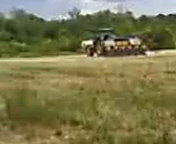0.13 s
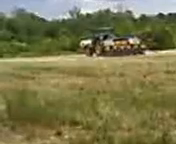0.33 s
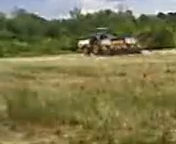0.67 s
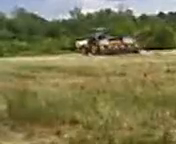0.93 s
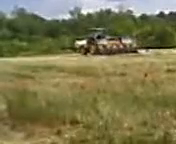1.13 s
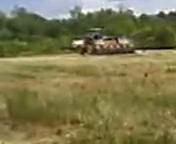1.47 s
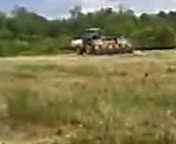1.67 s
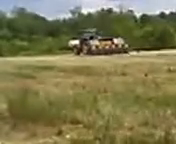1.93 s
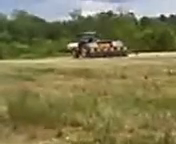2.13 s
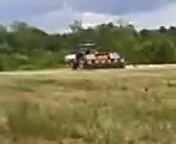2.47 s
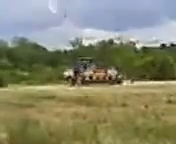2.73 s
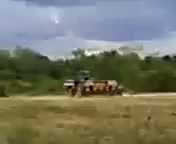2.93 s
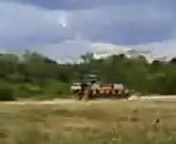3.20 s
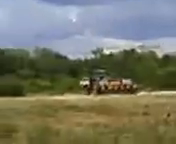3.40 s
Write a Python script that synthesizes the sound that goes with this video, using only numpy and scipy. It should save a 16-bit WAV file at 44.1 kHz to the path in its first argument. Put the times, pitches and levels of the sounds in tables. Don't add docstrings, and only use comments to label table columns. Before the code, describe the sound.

Silence until 0.13 s, then a tiny switch-on crackle and a diesel tractor is at once running. It drones steadily to the end, about 25 firings a second in a lumpy three-beat pattern: hollow exhaust puffs, metallic valve clatter, pulsing hiss, thin gear whine. Clatter sharpens after about 2.6 s. Wind thumps softly near 2.67 s, fainter puffs follow, and a slight tick at 3.34 s. Open field, muffled narrow-band microphone.

```python
import sys
import numpy as np
from scipy import signal
from scipy.fft import rfft, irfft
from scipy.io import wavfile

SR = 44100
rng = np.random.default_rng(int(sys.argv[2]) if len(sys.argv) > 2 else 0)


def to_wav(s):
    ch = np.atleast_2d(s).T
    pcm = np.round(np.clip(ch, -1, 1) * 32767)
    wavfile.write(sys.argv[1], SR, pcm.astype(np.int16))


def how_loud(loudness_db):
    steps = np.asarray(loudness_db, float) / 20
    return 10 ** steps


N = 157878
T = np.arange(N) / SR
SWITCH_ON_S = .13275
JITTER_S = .00006
CYCLE_SAMPLES = 5300


def in_time(rows):
    return np.interp(T, *np.transpose(rows)[:2])


def rms_one(x):
    return x / np.sqrt(np.mean(x ** 2) + 1e-20)


def cut(x, hz, kind, order=2):
    return signal.sosfilt(signal.butter(order, hz, kind, fs=SR, output="sos"), x)


def drift(rate_hz):
    pole = np.exp(-80 * np.pi * rate_hz / SR)
    slow = signal.lfilter([1], [1, -2 * pole, pole * pole], rng.standard_normal(N // 40 + 2002))[2000:]
    return np.interp(np.arange(N) / 40, np.arange(len(slow)), rms_one(slow))


def ring(strikes, hz, t60_s):
    pole, angle = how_loud(-60 / (t60_s * SR)), 2 * np.pi * hz / SR
    return signal.lfilter([0, np.sin(angle)], [1, -2 * pole * np.cos(angle), pole * pole], strikes + 1e-18)


def clicks(times_s, sizes):
    out = np.zeros(N)
    at = (times_s * SR).astype(int)
    inside = (at >= 0) & (at < N)
    np.add.at(out, at[inside], sizes[inside])
    return out


def bell(width_s):
    half = int(4 * width_s * SR)
    return np.exp(-.5 * (np.arange(-half, half + 1) / (width_s * SR)) ** 2)


def swell(centre_s, width_s):
    return np.exp(-.5 * ((T - centre_s) / width_s) ** 2)


def each_cycle(noise, turns):
    return noise[..., (turns / 3 % 1 * CYCLE_SAMPLES).astype(int)]


def switch_on():
    # after_s (from switch-on), signed height
    crackle = [
        (.00008, .8),
        (.00024, .4),
        (.00031, .8),
        (.00058, .8),
        (.00068, -.6),
        (.00088, 1),
    ]
    after_s, height = np.transpose(crackle)
    spikes = signal.fftconvolve(clicks(SWITCH_ON_S + after_s, height), bell(.000026), "same")
    fizz_db, fizz_s, fizz_t60_s = -31, .025, .11
    since = T - SWITCH_ON_S
    decay = how_loud(fizz_db - 60 * np.clip(since, 0, 1) / fizz_t60_s)
    gate = (since > 0) * np.clip((fizz_s - since) * 500, 0, 1)
    fizz = rms_one(cut(rng.standard_normal(N), [3600, 8200], "band", order=4))
    return spikes + decay * gate * fizz


def crank():
    # time_s, firing_rate_hz
    speed = [(0, 24.9), (.3, 24.9), (.7, 24.976), (1.1, 24.975), (1.5, 24.944), (1.9, 24.925),
             (2.3, 24.933), (2.7, 24.954), (3.1, 24.951), (3.6, 24.9)]
    turns = np.cumsum(in_time(speed)) / SR
    return turns - np.interp(.3795, T, turns)


def firings(turns):
    count = np.arange(np.ceil(turns[0]), turns[-1]).astype(int)
    times_s = np.interp(count, turns, T) + JITTER_S * rng.standard_normal(len(count))
    return times_s, count % 3


def exhaust(fired_s, cylinder, turns):
    # multiple of the firing rate, level_db (rms)
    tones = [(1, -15), (2, -13), (3, -17.5), (4, -7.5), (5, -9.5), (6, -7), (7, -19), (8, -12.5),
             (9, -25.5), (11, -13), (14, -14)]
    # pitch_hz, t60_s, level_db for each of three cylinders
    pipe = [(162, 0.13, -18.5, -14, -27), (266, 0.3, -9, -15.5, -10), (295, 0.17, 1.5, -20, -28.5),
            (364.3, 0.12, -15.5, -21, 3.5), (424.3, 0.22, -2, -13, -5.5), (520, 0.05, -9, -16, -14),
            (581, 0.14, -13.5, -15, -10), (642, 0.13, -14.5, -10.5, -13), (716, 0.15, -17, -5.5, -8.5)]
    tone_wander_db, puff_scatter_db = 2.2, 2.5
    pipe_lag_s, pipe_damping = -.014, .65
    out = np.zeros(N)
    for k, db in tones:
        sweep = .09 * (k - 4.6) * (2 < k < 8)
        lead = sweep + k * 25 * .0004
        level = how_loud(db + tone_wander_db * drift(5))
        out += np.sqrt(2) * level * np.cos(2 * np.pi * (k * turns + lead))
    for hz, t60_s, *db in pipe:
        puffs = how_loud(np.array(db)[cylinder] + puff_scatter_db * rng.standard_normal(len(fired_s)))
        out += ring(clicks(fired_s + pipe_lag_s, puffs), hz, t60_s * pipe_damping)
    return out


def chuff(fired_s, cylinder, turns):
    cylinder_db, scatter_db = np.array((-13, -18, -6)), 1.2
    lag_s, length_s = .02, .0097
    sizes = how_loud(cylinder_db[cylinder] + scatter_db * rng.standard_normal(len(fired_s)))
    gate = signal.fftconvolve(clicks(fired_s + lag_s, sizes), bell(length_s), "same")
    white = rng.standard_normal(N)
    breath = .85 * each_cycle(white, turns) + .5 * white[::-1]
    return gate * rms_one(cut(breath, [488, 733], "band"))


def clatter(fired_s, cylinder):
    # pitch_hz, t60_s, level_db for each of three cylinders
    block = [(1696.5, 0.056, -3.5, -5.5, -3), (2226, 0.035, -6, 5, 1.5), (2444, 0.04, -11, 4.5, -3.5),
             (2880, 0.013, -12, -9.5, -2), (3090, 0.034, -5, -6, -9.5)]
    # lag_s, level_db
    knocks = [
        (.0155, -13),
        (.0195, -1),
        (.0225, -3),
        (.026, -6),
        (.031, -10),
    ]
    # time_s, hard_knock_extra_db, next_cylinder_extra_db
    slams = [(.2, 0.5, 3), (.32, -3.5, -3), (.44, -4, -10), (.56, -9.5, 1), (.68, -5.5, 3.5), (.8, -1, -7),
             (.92, -1, -4), (1.04, -2.5, -7), (1.16, 0.5, -4), (1.28, -3.5, -2), (1.4, 2.5, -9),
             (1.52, -1, -0.5), (1.64, -1, 3), (1.76, 2, 0), (1.88, 0, -7), (2, 0, -5), (2.12, 2.5, 2),
             (2.24, 0.5, 2.5), (2.36, 0, 1), (2.48, 2.5, -1), (2.6, 2.5, 6.5), (2.72, 4, 2), (2.84, 4.5, 2),
             (2.96, 3.5, 2), (3.08, 4.5, 5.5), (3.2, 4, -5.5), (3.32, 2.5, 2), (3.44, 2.5, -2),
             (3.56, 1, 0)]
    spread_s, scatter_db = .0005, 1.3
    lag_s, knock_db = np.transpose(knocks)
    cycle_s, hard_db, next_db = np.transpose(slams)

    late_s = (lag_s + spread_s * rng.standard_normal((3, len(lag_s))))[cylinder]
    late_s = late_s + 1.5 * JITTER_S * rng.standard_normal(late_s.shape)
    times_s = (fired_s[:, None] + late_s).ravel()

    middle_s = fired_s[:, None] + .02 - .04 * (cylinder[:, None] - 1)
    cycle = np.abs(middle_s - cycle_s).argmin(axis=1)
    extra_db = np.choose(cylinder, [0 * fired_s - 2, hard_db[cycle], next_db[cycle]])[:, None]

    out = np.zeros(N)
    for hz, t60_s, *db in block:
        level_db = np.array(db)[cylinder, None] + knock_db
        level_db = level_db + extra_db * (hz > 2000)
        sizes = how_loud(level_db + scatter_db * rng.standard_normal(late_s.shape))
        out += ring(clicks(times_s, sizes.ravel()), hz, t60_s)
    return cut(out, 3100, "low", order=4)


def gear_whine():
    # time_s, level_db
    load = [(.2, -14.5), (.9, -13), (1, -11.5), (1.6, -10), (1.9, -14.5), (2.9, -12.5), (3.4, -12.5),
            (3.58, -6)]
    pitch_hz, width_hz = 1698, 13
    return how_loud(in_time(load)) * rms_one(ring(rng.standard_normal(N), pitch_hz, 2.2 / width_hz))


def hiss(fired_s, turns):
    # pitch_hz, level_db
    colour = [(130, -9), (204, -7), (425, -8), (750, -13.5), (1000, -19), (2470, -12), (3500, -35),
              (5000, -51)]
    # pitch_hz, share (0-1)
    repeats = [(200, .7), (500, .8), (800, .7), (1200, .5), (2400, .5), (3000, .15)]
    hiss_db, patchy_db, bright_patchy_db = -2, 1.8, 1.5
    dip_db, bright_dip_db, dip_lag_s, dip_s = -1, -5, .0081, .0033
    dips = signal.fftconvolve(clicks(fired_s + dip_lag_s, np.ones(len(fired_s))), bell(dip_s), "same")
    fresh = rng.standard_normal((2, N))
    looped = each_cycle(rng.standard_normal((2, CYCLE_SAMPLES)), turns)
    bright_wander = drift(20)
    hz, db = np.transpose(colour)
    edges = 130 * 2 ** np.arange(0, 5.6, .5)
    rush = 0
    for k, (low, high) in enumerate(zip(edges, edges[1:])):
        level_db = np.interp(np.log(low * high) / 2, np.log(hz), db) + patchy_db * drift(12.7)
        level_db = level_db + (low > 1400) * bright_dip_db * dips
        level_db = level_db + (low > 2800) * bright_patchy_db * bright_wander
        share = np.interp(np.sqrt(low * high), *np.transpose(repeats))
        white = np.sqrt(share) * looped[k % 2] + np.sqrt(1 - share) * fresh[k % 2]
        rush = rush + how_loud(level_db) * cut(white, [low, high], "band")
    return how_loud(dip_db * dips) * (how_loud(hiss_db) * rms_one(rush) + gear_whine())


def wind():
    # centre_s, level_db, length_s, cutoff_hz
    gusts = [
        (2, -34, 0.017, 132),
        (2.58, -34, 0.057, 200),
        (2.657, -28.5, 0.0086, 400),
        (2.673, -19, 0.0087, 240),
        (2.695, -23.5, 0.006, 150),
        (3.15, -34, 0.027, 160),
        (3.296, -34.5, 0.032, 68.5),
        (3.403, -29, 0.014, 100),
        (2.68, -27, .022, 330),
    ]
    out = how_loud(-44 + drift(4.9)) * rms_one(cut(rng.standard_normal(N), [25, 110], "band"))
    for centre_s, db, length_s, hz in gusts:
        rumble = rms_one(cut(rng.standard_normal(N), [hz / 3, hz], "band"))
        out += how_loud(db) * swell(centre_s, length_s) * rumble
    return out


def body_tick():
    tick_s = 3.336
    dip = -how_loud(-15) * signal.fftconvolve(clicks(np.array([tick_s]), np.ones(1)), bell(.00007), "same")
    fizz = rms_one(cut(rng.standard_normal(N), [2500, 4700], "band"))
    return dip + how_loud(-36) * swell(tick_s, .004) * fizz


def scene():
    # time_s, level_db
    loudness = [(.13, -31.5), (.6, -31), (1.5, -30.5), (2.4, -31), (3, -31), (3.58, -30.5)]
    turns = crank()
    fired_s, cylinder = firings(turns)
    tractor = exhaust(fired_s, cylinder, turns) + chuff(fired_s, cylinder, turns)
    tractor = tractor + clatter(fired_s, cylinder) + hiss(fired_s, turns)
    return (how_loud(in_time(loudness)) * tractor + wind() + body_tick())[None]


def dropouts(x):
    # low_edge_hz, rarity (spreads of the wander)
    bands = [(3400, 1.7), (3700, 1.2), (4000, 1), (4300, 1), (4600, .9), (4850, .6), (5050, .1)]
    hz = np.arange(N // 2 + 1) * SR / N
    spectrum = rfft(x)
    upper_edges = [low for low, _ in bands[1:]] + [SR]
    for (low, rarity), high in zip(bands, upper_edges):
        muted = np.clip(3 * (drift(22) - rarity), 0, .93)
        x = x - muted * irfft(spectrum * ((hz >= low) & (hz < high)), N)
    return x


def low_pass(x):
    return signal.sosfilt(signal.butter(12, 13700, fs=SR, output="sos"), x)


def record(dry):
    on = T > SWITCH_ON_S
    settle_s, settle_db = .022, -9
    unsettled = np.clip(1 - (T - SWITCH_ON_S) / settle_s, 0, 1) ** .5
    x = cut(dry, 2950, "low", order=3) * how_loud(settle_db * unsettled)
    x = (x - .0045) * on
    x = signal.sosfilt(signal.cheby2(18, 60, 5400, fs=SR, output="sos"), x)
    x = dropouts(x) * on
    mirror = x * np.cos(2 * np.pi * 11025 * T)
    x = x + how_loud(-66) * cut(mirror, [7800, 9600], "band", order=4)
    x = x + cut(switch_on(), 9000, "low", order=8)
    x = x + how_loud(-92) * on * cut(rng.standard_normal(N), 11000, "low")
    return low_pass(x)


dry = scene()
out = record(dry)
to_wav(out)
```